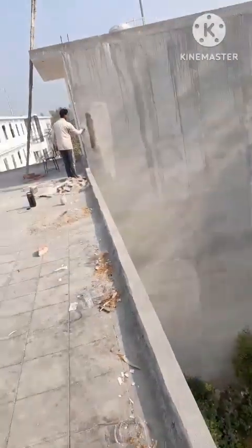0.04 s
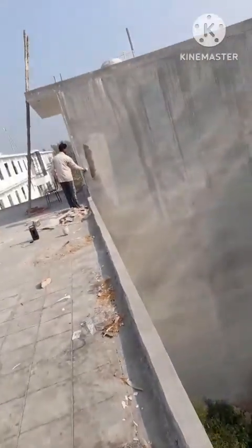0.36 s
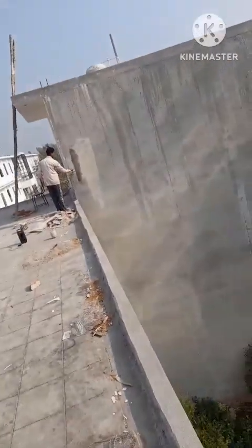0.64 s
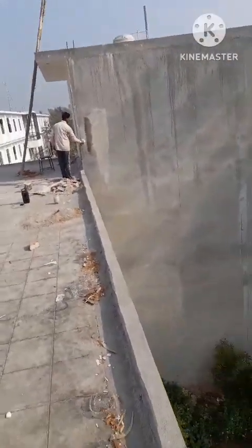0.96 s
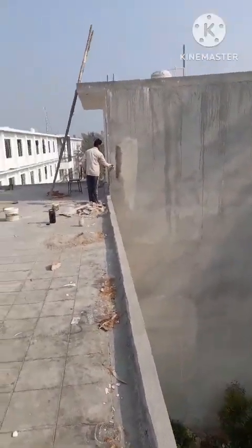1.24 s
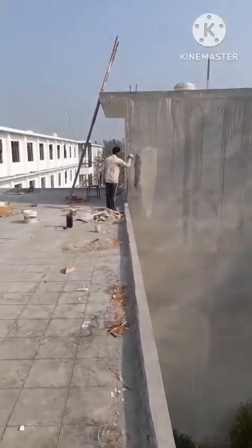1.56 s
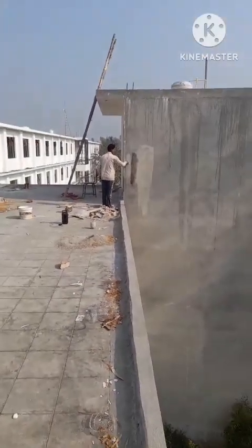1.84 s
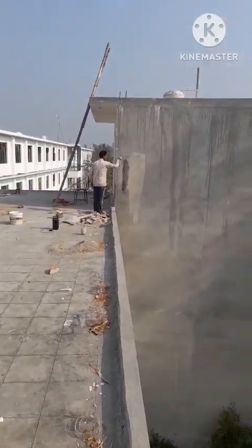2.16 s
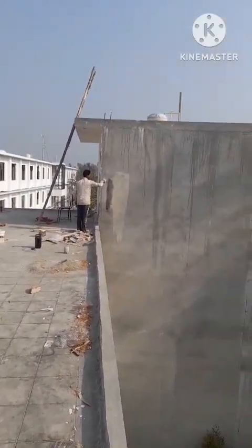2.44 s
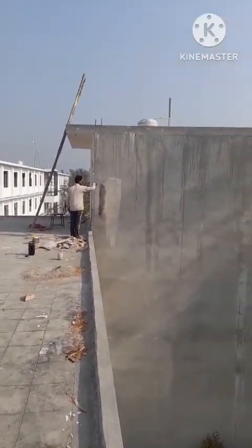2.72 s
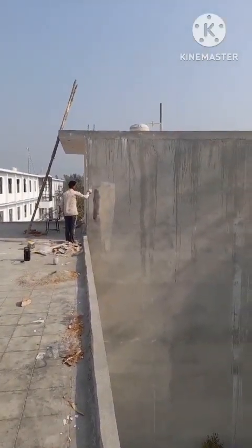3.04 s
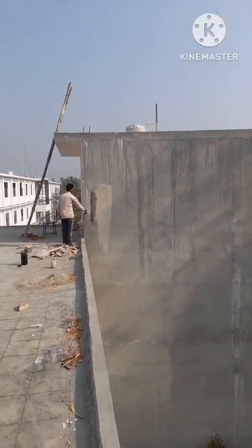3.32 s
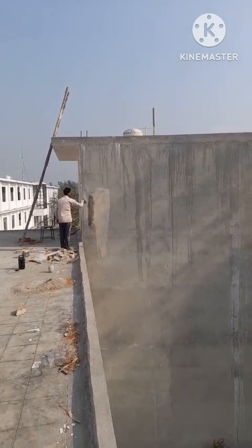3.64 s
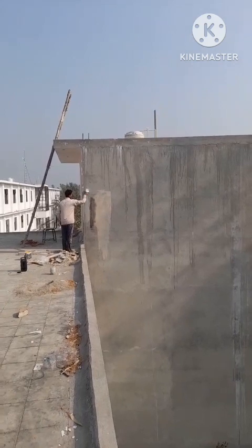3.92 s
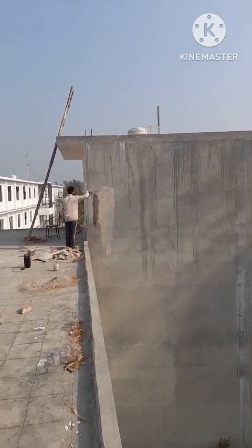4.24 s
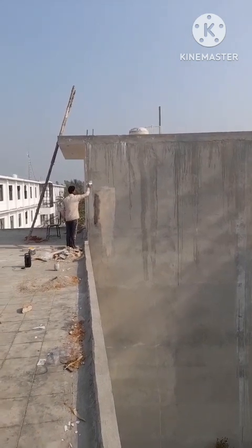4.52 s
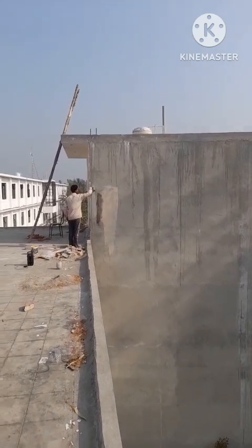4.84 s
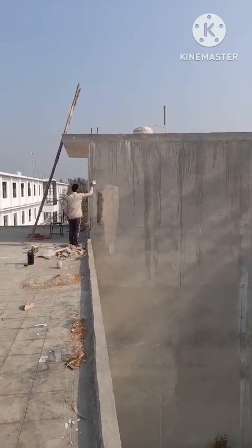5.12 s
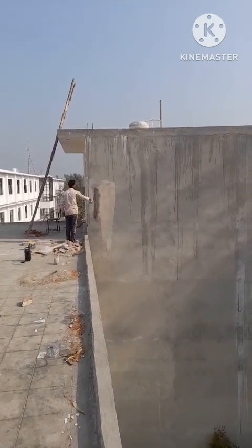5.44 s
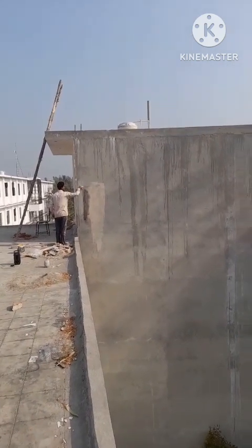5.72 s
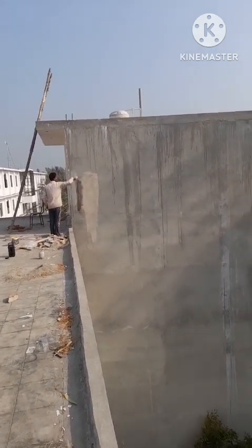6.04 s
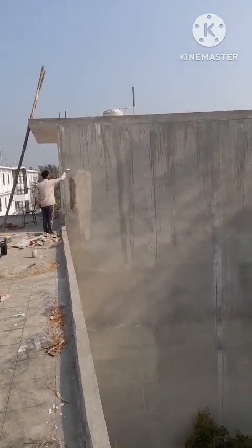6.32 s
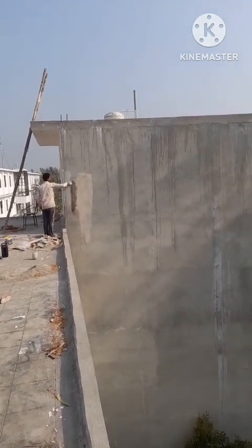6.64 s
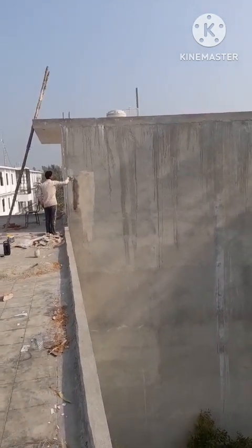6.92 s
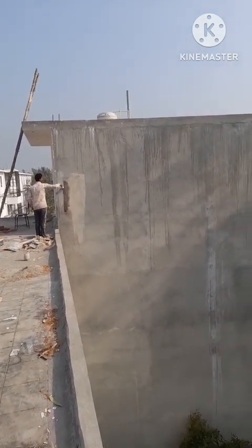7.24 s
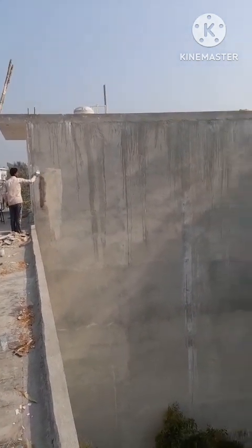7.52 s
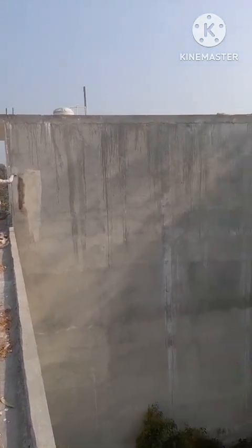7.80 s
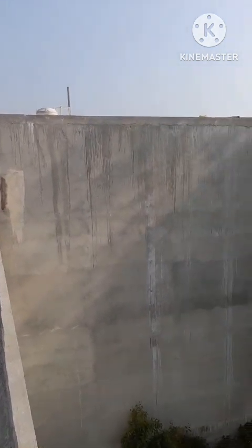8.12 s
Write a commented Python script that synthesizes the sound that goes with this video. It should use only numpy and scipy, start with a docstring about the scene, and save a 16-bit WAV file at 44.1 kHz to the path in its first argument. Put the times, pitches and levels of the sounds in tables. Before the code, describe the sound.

Gusty wind rumbles on the microphone outdoors while distant power cutters whine and faint birds call, after a sharp handling click.

```python
"""Windy rooftop with distant cutters.

Fingers scrape and knock on a hand-held phone as the palm shifts, then gusts buffet its two microphone
ports. From 3.4 s a distant high-speed cutter whines between the buildings; at about 5.6 s two more
join it at slightly different speeds. Far birds whistle over the hum of the town."""
import sys
import numpy as np
from scipy import signal
from scipy.fft import irfft, next_fast_len
from scipy.io import wavfile
from scipy.ndimage import uniform_filter1d

SR = 44100
rng = np.random.default_rng(int(sys.argv[2]) if len(sys.argv) > 2 else 0)


def master(y):
    """Save y as 16-bit WAV."""
    cut = np.clip(np.atleast_2d(y).T, -1, 1)
    pcm = np.round(cut * 32767)  # scale
    wavfile.write(sys.argv[1], SR, pcm.astype(np.int16))


N = 364618
TIME = np.arange(N) / SR
PADDED = next_fast_len(N, real=True)
BINS = np.fft.rfftfreq(PADDED, 1 / SR)


# The breeze at the windward left port: t/s, level/dB
BREEZE = [(0, -35.5), (.42, -43), (.58, -58.5), (1.2, -57), (1.5, -50), (2.1, -58.5), (2.5, -64),
          (3.05, -53.5), (3.25, -49), (4.2, -50), (4.45, -49.5), (5.3, -45.5), (5.9, -45), (6.2, -35),
          (6.6, -35), (7.4, -41.5), (7.9, -41), (8.27, -42)]
# Gusts that swell and fade: peak t/s, length/s, level/dB, left minus right/dB
GUSTS = [(0.106, 0.03, -37, 5), (0.183, 0.086, -43, -4), (0.266, 0.099, -41, 14), (0.616, .035, -49.5, -1),
         (.73, .03, -67, 4), (1.383, 0.067, -57, 19), (1.609, 0.051, -41, -2.5), (1.792, 0.042, -41, -1.5),
         (1.969, 0.033, -44, -1), (2.105, 0.035, -58, 5), (2.67, 0.028, -45.5, 3), (2.795, 0.07, -46, 0.5),
         (2.989, 0.027, -49, 2), (3.34, .03, -53.5, 6), (3.543, 0.083, -44, 2), (3.727, 0.19, -52.5, 17.5),
         (4.015, 0.081, -40.5, 0.5), (4.158, 0.099, -39, 0.5), (4.734, 0.086, -46, 2),
         (5.014, 0.14, -41, -0.5), (5.48, 0.11, -39, -1), (5.576, 0.034, -39.5, -3),
         (6.043, 0.11, -39, -1.5), (6.346, 0.086, -30.5, -1), (6.509, 0.11, -34, -6.5),
         (6.588, 0.012, -29, -2), (6.724, 0.093, -34.5, -5.5), (6.818, 0.074, -35, -1.5),
         (7.016, 0.096, -37.5, -1.5), (7.165, 0.037, -31.5, 0), (7.323, 0.12, -35, 0.5),
         (7.46, 0.14, -35, -1.5), (7.623, 0.031, -39, 11.5), (7.715, 0.047, -32.5, -2.5),
         (8.01, 0.048, -44.5, 10), (8.086, 0.042, -33.5, -1.5), (8.197, 0.011, -35.5, 5)]
# Brief lulls, and two slight lifts: t/s, half length/s, gain/dB
LULLS = [(0.05, 0.022, -14), (3.08, 0.035, -12), (4.912, 0.017, -8), (5.28, 0.055, -6), (5.414, 0.022, -13),
         (6.201, 0.031, -16), (6.873, 0.015, 2), (7.09, 0.029, -4), (7.578, 0.013, -3), (7.854, .045, 2),
         (7.948, 0.017, -13), (8.182, 0.012, -6)]

def wind_force(restless_db=3, lee_db=-23.5):
    """Wind strength in dB at each port: a restless breeze, sheltered on the right, plus gusts."""
    breeze_db = curve(BREEZE)
    power = np.array([gain_of(breeze_db + shelter_db + restless_db * wander(6.4).real) ** 2
                      for shelter_db in (0, lee_db)])
    for s, length, db, left_db in GUSTS:
        near = abs(TIME - s) < 2 * length
        swell = np.exp(-2 * ((TIME[near] - s) / length) ** 2)
        power[:, near] += (gain_of(db) * pan(left_db) * swell) ** 2
    lulls_db = sum(db * np.exp(-((TIME - s) / length) ** 2) for s, length, db in LULLS)
    return 10 * np.log10(power) + lulls_db


# Bass-heavy colour of air buffeting a port: f/Hz, level/dB
BUFFET_SPECTRUM = [(20, -17), (45, -4.5), (65, 0.5), (90, 5), (120, 1), (170, -6), (240, -12), (330, -11.5),
                   (430, -17), (550, -28.5), (700, -31), (900, -49), (1500, -36), (3000, -98)]

def wind(trim_db=1, split_hz=145, chop_db=4, chop_hz=18, breeze_top_db=-44, strong_gust_db=-34):
    """Unrelated turbulence at each port; stronger gusts shed smaller eddies and reach higher."""
    lowpass = signal.butter(2, split_hz, fs=SR, output="sos")
    out = []
    for force_db, air in zip(wind_force(), stereo_noise(BUFFET_SPECTRUM, -0.019)):
        low = signal.sosfiltfilt(lowpass, air)
        # The flow catches the port and lets go.
        chop = evened(gain_of(chop_db * np.tanh(2 * wander(chop_hz).real)))
        bright_db = 3.5 + 0.93 * np.minimum(force_db - strong_gust_db, 3)
        upper = (air - low) * flutter(depth_db=4, rate_hz=51) * gain_of(bright_db)
        # Above a breeze, the rumble grows more slowly than the gust.
        rumble = low * chop * gain_of(-.22 * np.maximum(force_db - breeze_top_db, 0))
        running_level = np.sqrt(uniform_filter1d(air ** 2, size=4000) + 0.043)
        out.append(gain_of(force_db + trim_db) * (rumble + upper) / running_level)
    return np.array(out)


# Thumps of air: t/s, level/dB, half length/s, f/Hz, left minus right/dB
EDDIES = [(6.275, -28.5, 0.011, 92, 12), (6.327, -26, 0.0058, 116, 7), (6.368, -40, 0.0032, 90, -2),
          (6.416, -25.5, 0.0015, 323, 5), (6.436, -30, 0.0063, 95, 6), (6.512, -32.5, 0.0064, 280, -13),
          (6.623, -32.5, 0.0017, 453, -17), (6.678, -34, 0.0056, 107, 14), (6.749, -25, 0.0044, 131, 13),
          (6.852, -27.5, 0.0012, 220, -10), (6.93, -33, 0.0036, 333, -3), (7.02, -32.5, 0.0022, 263, 6),
          (7.145, -34, 0.0044, 330, -4), (7.229, -39, 0.014, 90, 22), (7.309, -23, 0.0019, 405, 1),
          (7.322, -33, 0.0034, 90, 0), (7.37, -29.5, 0.0044, 142, -5), (7.536, -23.5, 0.0051, 84, -1),
          (7.656, -31, 0.0043, 119, 25.5), (7.69, -26, 0.0019, 170, 7), (7.7105, -25, 0.0033, 398, -9),
          (7.7157, -28, 0.00087, 300, 0), (7.726, -22.5, 0.01, 102, -1), (8.094, -31, 0.0083, 130, 0),
          (8.2, -37.5, 0.0098, 106, 13)]

def eddies():
    """Single eddies hit the ports, each with a swing or two of pressure."""
    out = np.zeros((2, N))
    for s, db, length, hz, left_db in EDDIES:
        near = abs(TIME - s) < 3 * length
        t = TIME[near] - s
        thump = np.cos(2 * np.pi * hz * t) * np.exp(-(t / length) ** 2)
        out[:, near] += gain_of(db) * thump * pan(left_db)
    return out


# Finger strokes: t/s, length/s, level/dB, attack/s
FINGER_STROKES = [(0.014, 0.066, -47, 0.043), (.1, 0.18, -61.5, .02), (0.258, 0.07, -44.5, 0.045),
                  (0.677, 0.1, -59.5, 0.011), (0.807, 0.26, -52.5, 0.13), (1.267, 0.043, -49, 0.0054),
                  (1.396, 0.25, -58.5, 0.14), (1.695, 0.16, -58.5, 0.047), (1.873, 0.26, -66, 0.028)]
# Hiss of skin on the case: f/Hz, level/dB
RUB_SPECTRUM = [(900, 6), (2000, 2.5), (3000, -0.5), (4200, 3), (6700, 2.5), (8200, -8), (10000, -2.5),
                (13000, -3.5), (15500, -4)]

def finger_rubs():
    """Skin sticks and slips on the case in grainy strokes, nearer the right port."""
    strokes = swells(FINGER_STROKES, release_s=0.042)
    return stereo_noise(RUB_SPECTRUM, 0.019) * strokes * flutter(depth_db=2, rate_hz=280) * pan(-3.5)


# Resonant colour of the scraped case: f/Hz, level/dB
SCRAPE_SPECTRUM = [(180, -30), (300, -26), (968, -2), (1420, -20.5), (1540, -20), (2980, -9.5), (3280, -37),
                   (3450, -12), (4070, -8), (5050, 0.5), (6790, -3.5), (8280, -15), (12100, -7),
                   (14700, -25), (15500, -18)]

def nail_scrape():
    """A nail sticks and slips as it is dragged once over the port."""
    drag = held(s=0.037, length=0.037, db=-21.5, attack_s=0.022, release_s=0.0039)
    likeness = across_bins([(1500, 0.97), (4000, -0.067), (8000, -0.67), (12000, -0.088)])
    return stereo_noise(SCRAPE_SPECTRUM, likeness) * drag * flutter(depth_db=3, rate_hz=340) * pan(-3)


# Sharp catches of a nail: t/s, level/dB
CLICKS = [(.0432, -18), (0.0472, -2.5), (.0532, -12), (0.0577, -10), (.0642, -21), (0.0681, -14),
          (.0765, -25), (.0988, -30), (.108, -34), (.62, -44), (0.692, -54), (0.752, -53)]
# Bright ring of the case: f/Hz, level/dB, decay/s
CLICK_MODES = [(1000, -34, .0012), (4380, 11, 0.0022), (4990, 17, 0.00093), (6720, 9, 0.0013),
               (11500, -19, .0002)]

def nail_clicks(trim_db=-1):
    """Each catch sets the stiff case ringing for a millisecond or two."""
    return gain_of(trim_db) * struck(CLICKS, CLICK_MODES, right_phase_rad=2.24) * pan(-3)


# A bump and its bounces: t/s, level/dB
BUMPS = [(.3025, -17.5), (.3071, -21.5), (.3102, -22.5), (.3207, -39)]
# Dull ring of the case: f/Hz, level/dB, decay/s
BUMP_MODES = [(476, 9, 0.0022), (850, -12, 0.0018), (1297, -11, 0.008)]

def grip_bumps():
    """The grip bumps the case and bounces, sounding its low modes."""
    return struck(BUMPS, BUMP_MODES, right_phase_rad=0.17) * pan(-3)


# Knocks of the grip: t/s, level/dB, decay/s, lowest f/Hz, highest f/Hz
KNOCKS = [(0.301, -21, 0.0057, 202, 1170), (0.31, -27.5, 0.048, 330, 1380),
          (1.274, -31.5, 0.0082, 1460, 4960)]
# Dull colour of the hand on the case, for knocks and palm alike: f/Hz, level/dB
GRIP_SPECTRUM = [(120, -19), (330, -4), (500, -7.5), (700, -7), (950, -6.5), (1400, -10), (2000, -12),
                 (3000, -23), (6000, -25), (15000, -16.5)]

def grip_knocks(trim_db=-1):
    """Dull blows on the case: bands of noise that start at once and die away."""
    noise, out = stereo_noise(GRIP_SPECTRUM, 0.37), np.zeros((2, N))
    for s, db, decay, low_hz, top_hz in KNOCKS:
        fade = (TIME >= s) * np.exp(-np.clip((TIME - s) / decay, 0, 60))
        out += gain_of(db + trim_db) * fade * bandpass(noise, low_hz, top_hz)
    return out * pan(-2.5)


# Shifts of the palm: t/s, length/s, level/dB, attack/s
PALM_SHIFTS = [(0.092, 0.018, -47, .006), (.19, 0.088, -44, .1)]

def palm():
    """The palm slides on the case with a soft, low rustle."""
    rustle = evened(bandpass(stereo_noise(GRIP_SPECTRUM, 0.55), low_hz=240, top_hz=600))
    return swells(PALM_SHIFTS, release_s=.025) * rustle


# Each cutter's bites into the work: t/s, length/s, level/dB
BITES_A = [(3.372, 0.094, -57.5), (3.48, 0.23, -53.5), (3.73, 0.18, -56.5), (3.93, 0.28, -53.5),
           (4.24, 0.093, -59.5), (4.51, 0.16, -62.5), (4.63, 0.28, -59), (4.95, 0.22, -59.5),
           (5.2, 0.31, -69.5), (5.57, 0.027, -61), (5.64, 0.12, -54.5), (5.80, 0.1, -52.5),
           (5.96, 0.047, -56), (6.06, .12, -55.5), (6.22, 0.21, -54.5), (6.42, 0.21, -58.5),
           (6.54, 0.47, -55), (7.065, 0.11, -54.5), (7.25, 0.27, -55), (7.57, 0.3, -57.5),
           (7.81, 0.15, -57.5), (7.96, 0.39, -56.5)]
BITES_B = [(5.574, 0.018, -51.5), (5.632, 0.03, -49), (5.772, 0.11, -49.5), (5.9, 0.25, -57),
           (6.178, 0.32, -48.5), (6.245, 0.096, -46.5), (6.532, 0.17, -42), (6.71, 0.436, -52),
           (7.093, 0.065, -50.5), (7.237, 0.094, -48.5), (7.36, 0.51, -64)]
BITES_C = [(5.561, 1.2, -60.5), (5.797, 0.07, -58), (6.809, 0.023, -53), (6.891, 0.11, -52),
           (7.11, 0.17, -50.5), (7.336, 0.22, -48), (7.595, 0.16, -57.5), (7.936, 0.27, -57)]
# How each spindle runs: t/s, rotation f/Hz, share of steady tone/0-1, disc ring/dB
SPINDLE_A = [(3.3, 415, .5, -3), (3.45, 415.5, .25, -2), (3.7, 416, .17, 3), (4.3, 414.5, .05, -3),
             (4.6, 417, .05, -1), (5.1, 411.5, .06, -3), (5.6, 416, .1, -2), (6.4, 416, .14, 4),
             (7.2, 418, .1, 3), (7.7, 418, .15, 2), (7.87, 418, .15, -7), (8, 418, .25, 1),
             (8.27, 418, .25, -2)]
SPINDLE_B = [(5.5, 433.5, .9, -3), (6.1, 433, .9, -3), (6.3, 432.7, .96, 0), (6.7, 432.4, .98, 1),
             (7.1, 432, .85, 0), (7.4, 431, .5, -3), (8.27, 424, .3, -3)]
SPINDLE_C = [(5.5, 407, .3, -4), (6.2, 408, .35, 1), (6.8, 409, .6, 0), (6.95, 409, .85, -3),
             (7.15, 408.3, .9, -2), (7.35, 407, .96, -3), (7.55, 406.3, .97, -2), (7.7, 405.5, .5, 6),
             (7.87, 405, .5, -3), (8, 404.7, .7, 6), (8.27, 404, .6, 4)]
# Timbre of each disc and its teeth: order/multiple of the rotation, level/dB
ORDERS_A = [(6, -12), (7, 0), (8, -2.5), (9, -11.5), (10, -23), (11, -24), (12, -29), (17, -31)]
ORDERS_B = [(5, -26), (6, -28), (7, -22), (8, 0), (9, -26), (10, -25), (11, -25), (13, -37), (14, -37),
            (15, -30), (16, -33)]
ORDERS_C = [(6, -10.5), (7, 0), (8, -11), (9, -13), (10, -16.5), (11, -19), (12, -31), (13, -32), (14, -31),
            (15, -32), (16, -29), (17, -28), (18, -33), (19, -37), (20, -35), (21, -37), (22, -37),
            (24, -33), (25, -29), (26, -35), (27, -35), (28, -34), (31, -37), (34, -32)]
# The third cutter brightens as it sinks in: t/s, tilt about the seventh order/dB per order
TILT_C = [(5.5, 0.5), (7.15, -0.8), (7.35, -0.5), (7.5, 0.5), (7.65, 0.5), (8.05, 1.8), (8.27, 1.9)]

def cutters():
    """One cutter chatters; two more come in later and sing, all over the hiss of the cut."""
    bites = [biting(rows) for rows in (BITES_A, BITES_B, BITES_C)]
    first = whine(SPINDLE_A, bites[0], ORDERS_A, trim_db=0.5, left_db=0, lead_rad=.05,
                  smear_hz=14, jitter=0.0015, stutter_db=2.8, sag=.05)
    second = whine(SPINDLE_B, bites[1], ORDERS_B, trim_db=3, left_db=2.2, lead_rad=.22,
                   smear_hz=20, jitter=.0005, stutter_db=3)
    third = whine(SPINDLE_C, bites[2], ORDERS_C, trim_db=3.5, left_db=1, lead_rad=0.11,
                  smear_hz=15, jitter=0.00025, stutter_db=3, sag=.03, tilt=TILT_C)
    return first + second + third + grit(bites)


def biting(bites, attack_s=0.01, release_s=0.031, tremor_db=1.5):
    """The edge digs in quickly and rings off between the walls; the hand is never quite steady."""
    pressure = swells([(*row, attack_s) for row in bites], release_s)
    return pressure * gain_of(tremor_db * wander(28).real)


def whine(spindle, bite, orders, trim_db, left_db, lead_rad, smear_hz, jitter, stutter_db,
          sag=0, tilt=None, disc_hz=3370, disc_width_hz=380):
    """A fast spindle's harmonics: a steady tone plus the chatter of uneven bites, smeared by echoes."""
    s, turns_hz, steady, ring_db = np.transpose(spindle)
    on = TIME >= s[0]
    t = TIME[on]
    speed_hz = np.interp(t, s, turns_hz) * (1 + jitter * wander(10.46).real[on])
    angle = 2 * np.pi * np.cumsum(speed_hz) / SR
    steady, ring_db = np.interp(t, s, steady), np.interp(t, s, ring_db)
    grabs = evened(gain_of(stutter_db * wander(29).real[on]))  # the edge grabs and lets go
    clean, rough = np.sqrt(2 * steady), np.sqrt(1 - steady) * grabs
    tilt_db = curve(tilt)[on] if tilt else 0
    chatter, lag = wander(smear_hz), 0
    if sag:  # the chatter's pitch sags irregularly below the spindle's speed; the steady tone stays put
        drop_hz = turns_hz[0] * sag * np.exp(-4.3 * abs(wander(18)) ** 2)
        lag = 2 * np.pi * np.cumsum(drop_hz) / SR
    out = np.zeros((2, N))
    for order, db in orders:
        in_ring = np.exp(-((order * turns_hz[0] - disc_hz) / disc_width_hz) ** 2)
        level = gain_of(db + in_ring * ring_db + np.clip(order - 7, -2, 4) * tilt_db)
        tone = level * np.exp(1j * (order * angle + 2 * np.pi * rng.random()))
        dragged = chatter * np.exp(-1j * order * lag)
        # Three echoes reach both ports, and each port has three of its own.
        shared, *own = (sum(dragged[k:k + len(t)] for k in offsets) / np.sqrt(3)
                        for offsets in rng.integers(0, N - len(t), (3, 3)))
        for port in range(2):
            direct = clean * np.exp(1j * lead_rad * order * port)  # reaches the right port first
            out[port, on] += (tone * (direct + rough * (shared + own[port]))).real
    return gain_of(trim_db) * pan(left_db) * bite * out


# Gritty colour of the cut: f/Hz, level/dB
GRIT_SPECTRUM = [(1800, -10), (2600, -2.5), (3200, -2), (4000, -3.5), (5500, -7), (7200, -6), (7700, -25),
                 (8300, -20.5), (10000, -12.5), (12500, -12), (15500, -19)]
# A constant bed of hiss that swells as the cutters get to work: t/s, level/dB
HISS_BED = [(0, -66), (2.2, -67.5), (3.3, -65), (4.6, -65), (5.5, -64.5), (6.7, -58.5), (7.2, -60.5),
            (7.5, -55), (7.65, -62.5), (8.05, -61.5), (8.27, -61.5)]

def grit(bites, hiss_db=(-68.5, -88, -76), ordinary_bite_db=-56, db_per_bite_db=0.25):
    """Broad hiss of the material being cut: a bed, and a part that grows with each cutter's bite."""
    power = sum((gain_of(db) * (bite / gain_of(ordinary_bite_db)) ** db_per_bite_db) ** 2
                for bite, db in zip(bites, hiss_db))
    bed = gain_of(curve(HISS_BED))
    return np.sqrt(power + bed ** 2) * stereo_noise(GRIT_SPECTRUM, 0.068)


# One bird repeats a call that rises briefly, then falls: t/s, f/Hz, level/dB
FALLING_CALLS = [(.55, 1334, -62), (1.035, 1330, -59.5), (1.56, 1335, -61), (2.09, 1370, -62)]
# The call's two overlapping glides: delay/s, length/s, start, middle and end pitch/ratio, level/dB
CALL_GLIDES = [(0, 0.13, 0.96, .985, 0.92, -.5), (.07, .16, .95, .89, .8, -2)]
# Bird chirps, and brief 3.3 kHz rings, probably from a cutter's disc:
# t/s, length/s, start f/Hz, middle f/Hz, end f/Hz, level/dB
CHIRPS_AND_RINGS = [(0.876, 0.08, 1227, 1240, 1300, -62.5), (1.08, 0.032, 3980, 4060, 4160, -60),
                    (4.202, 0.21, 1560, 1620, 1580, -68), (4.951, 0.23, 1650, 1595, 1430, -68),
                    (5.55, .22, 1600, 1640, 1560, -68), (5.74, .2, 1470, 1420, 1310, -66),
                    (6.2, .24, 1590, 1650, 1690, -67), (6.94, 0.13, 1500, 1450, 1330, -61),
                    (8.01, 0.06, 4420, 4600, 4850, -69), (3.005, 0.066, 2770, 3200, 3130, -69),
                    (3.07, 0.067, 3060, 3260, 3020, -68), (3.12, 0.05, 3000, 2650, 2640, -69),
                    (3.16, .04, 3070, 3170, 2580, -69), (3.26, .035, 5900, 6150, 6050, -72),
                    (5.205, 0.074, 3330, 3370, 3350, -55.5), (5.33, 0.055, 3330, 3350, 3200, -64),
                    (7.015, .045, 3360, 3310, 3240, -52), (7.43, 0.064, 5000, 5300, 5570, -70),
                    (7.64, 0.14, 1720, 1880, 2030, -63), (7.85, .08, 4700, 4950, 5250, -75)]

def birds_and_rings(quaver=0.0025, hoarseness=0.5):
    """Hoarse bird whistles and a few brief rings glide along arcs of pitch, blurred by the walls."""
    calls = [(s + delay, length, hz * start, hz * middle, hz * end, db + glide_db)
             for s, hz, db in FALLING_CALLS
             for delay, length, start, middle, end, glide_db in CALL_GLIDES]
    shake = 1 + quaver * wander(50).real
    rasp = evened(1 + hoarseness * wander(56))
    out = np.zeros(N)
    for s, length, start, middle, end, db in calls + list(CHIRPS_AND_RINGS):
        at = np.flatnonzero((TIME >= s) & (TIME < s + length))
        progress = np.linspace(0, 1, len(at))
        arc = np.polyfit([0, .5, 1], [start, middle, end], 2)
        hz = np.polyval(arc, progress) * shake[at]
        tone = (rasp[at] * np.exp(2j * np.pi * np.cumsum(hz) / SR)).real
        envelope = np.sqrt(2 * np.sin(np.pi * progress).clip(0))
        out[at] += gain_of(db) * envelope * tone
    return wall_echoes(out)


def wall_echoes(x, t60_s=0.3, wet_db=-5):
    """Direct sound plus sparse reflections from the walls around."""
    t = np.arange(SR) / SR
    taps = rng.standard_normal((2, SR)) * (rng.random((2, SR)) < .03) * gain_of(-60 * t / t60_s)
    taps /= np.linalg.norm(taps, axis=1, keepdims=True)
    return x + gain_of(wet_db) * signal.fftconvolve(x[None], taps, axes=1)[:, :N]


# Colour of the town's hum: f/Hz, level/dB
TOWN_SPECTRUM = [(88, -59), (150, -9.5), (239, -9.5), (274, -1.5), (359, 0), (404, 0), (481, -3.5),
                 (766, -4), (1150, -6), (1910, -10), (2270, -12.5), (3620, -26), (4650, -21.5),
                 (11600, -34), (15500, -25)]
# Its slow rise and fall: t/s, level/dB
TOWN_LEVEL = [(0.0, -64.5), (0.92, -58.5), (2.3, -58.5), (3.1, -61.5), (3.5, -57.5), (4.2, -56.5),
              (4.6, -58), (5.4, -58), (6.4, -57), (7.2, -57.5), (7.9, -60.5), (8.27, -57)]
# Its stereo image, narrowest in the mids: f/Hz, left-right likeness/0-1
TOWN_LIKENESS = [(100, 0.34), (600, 0.83), (1400, 0.84), (3100, 0), (6000, 0)]

def town(trim_db=2, patchy_db=1.8, waver_db=.8):
    """Far traffic blends into a soft wash that drifts in patches of time and pitch."""
    traffic = stereo_noise(TOWN_SPECTRUM, across_bins(TOWN_LIKENESS))
    spectrogram = signal.stft(traffic, nperseg=2048)[2]
    patches = rng.standard_normal(spectrogram.shape[1:])
    for axis in (0, 1):
        patches = uniform_filter1d(patches, size=5, axis=axis)
    wash = signal.istft(spectrogram * gain_of(patchy_db * evened(patches)))[1][:, :N]
    return evened(wash) * gain_of(curve(TOWN_LEVEL) + trim_db + waver_db * wander(30).real)


def gain_of(db):
    return 10 ** (np.asarray(db) / 20)


def evened(x):
    """Scaled to unit RMS."""
    return x / np.sqrt(np.mean(np.abs(x) ** 2) + 1e-20)


def pan(left_db):
    return gain_of(np.array([[left_db], [-left_db]]) / 2)


def curve(points):
    return np.interp(TIME, *np.transpose(points))


def across_bins(points):
    """(Hz, value) points joined on a log-frequency axis."""
    hz, value = np.transpose(points)
    return np.interp(np.log(BINS + 1), np.log(hz + 1), value)


def bandpass(x, low_hz, top_hz):
    return signal.sosfilt(signal.butter(2, [low_hz, top_hz], "bandpass", fs=SR, output="sos"), x)


def wander(rate_hz, step=16):
    """Slow complex random drift of unit RMS."""
    coarse = TIME[::step]
    noise = rng.standard_normal(len(coarse)) + 1j * rng.standard_normal(len(coarse))
    slow = signal.sosfilt(signal.butter(2, rate_hz, fs=SR / step, output="sos"), noise)
    return np.interp(TIME, coarse, evened(slow))


def flutter(depth_db, rate_hz):
    """A randomly flickering gain of unit RMS."""
    return evened(gain_of(depth_db * wander(rate_hz).real))


def stereo_noise(spectrum, likeness):
    """Coloured noise at two partly alike ports, falling away below the spectrum's first point."""
    left, other = rng.standard_normal((2, len(BINS))) + 1j * rng.standard_normal((2, len(BINS)))
    right = likeness * left + np.sqrt(1 - likeness ** 2) * other
    low_cut = 1 / np.sqrt(1 + (spectrum[0][0] / (BINS + 1)) ** 6)
    colour = gain_of(across_bins(spectrum)) * low_cut
    return evened(irfft(np.array([left, right]) * colour, PADDED)[:, :N])


def held(s, length, db, attack_s, release_s):
    """An envelope that rises, holds and dies away."""
    t = TIME - s
    return gain_of(db) * np.clip(t / attack_s, 0, 1) * np.exp(-np.clip((t - length) / release_s, 0, 60))


def swells(rows, release_s):
    """Held envelopes added in power."""
    return np.sqrt(sum(held(*row, release_s) ** 2 for row in rows))


def struck(hits, modes, right_phase_rad):
    """Each hit rings the case's damped modes; the two ports hear them out of step."""
    t = np.arange(600) / SR
    phase = np.array([[0], [right_phase_rad]])
    ring = sum(gain_of(db) * np.exp(-t / decay) * np.sin(2 * np.pi * hz * t + phase)
               for hz, db, decay in modes)
    ring *= 1 - np.exp(-t / .0001)  # softens the onset
    blows = np.zeros(N)
    for s, db in hits:
        blows[round(s * SR)] += gain_of(db)
    return signal.oaconvolve(blows[None], ring / abs(ring).max(), axes=1)[:, :N]


def scene():
    """Air at the ports, the distant town and the hand on the phone, in stereo."""
    air = wind() + eddies()
    distance = town() + cutters() + birds_and_rings()
    handling = finger_rubs() + nail_scrape() + palm() + nail_clicks() + grip_bumps() + grip_knocks()
    return air + distance + handling


def record(dry):
    """The phone's band limit."""
    lowpass = signal.firwin(511, cutoff=15600, window=("kaiser", 9), fs=SR)
    return signal.oaconvolve(dry, lowpass[None], "same")


dry = scene()
out = record(dry)
master(out)
```